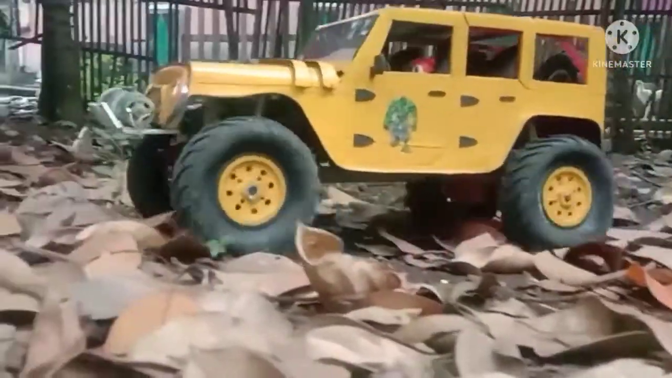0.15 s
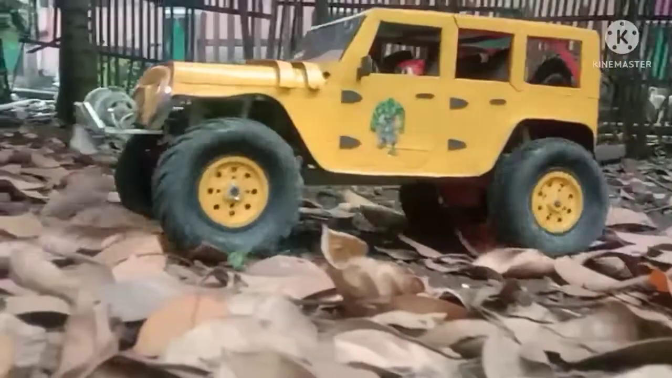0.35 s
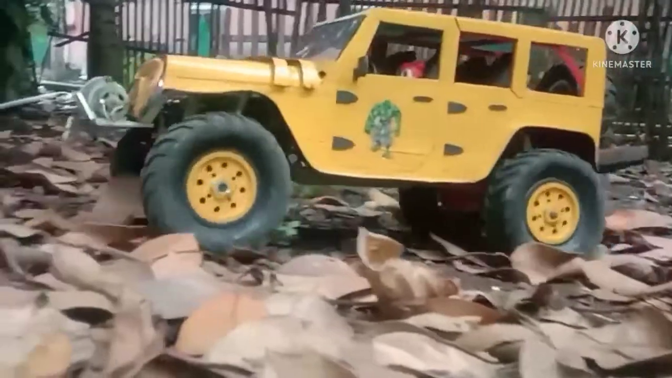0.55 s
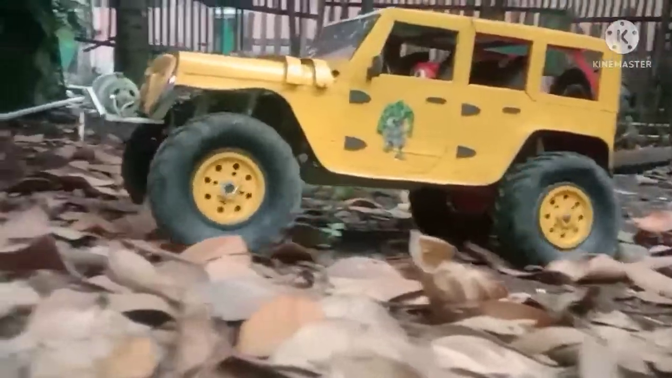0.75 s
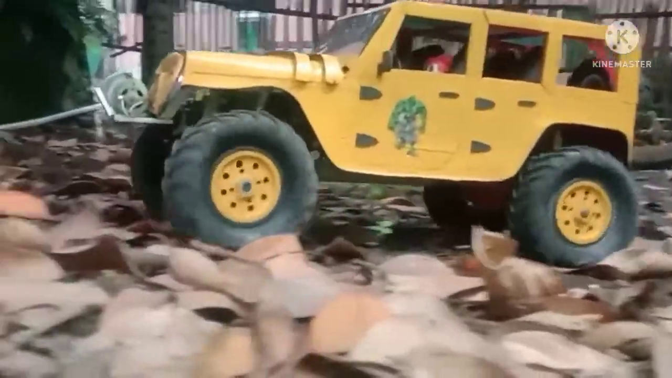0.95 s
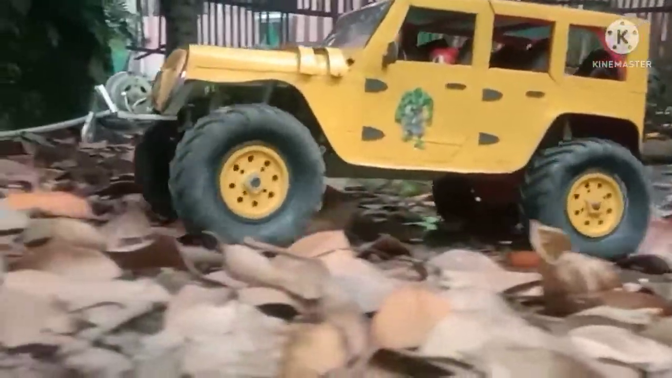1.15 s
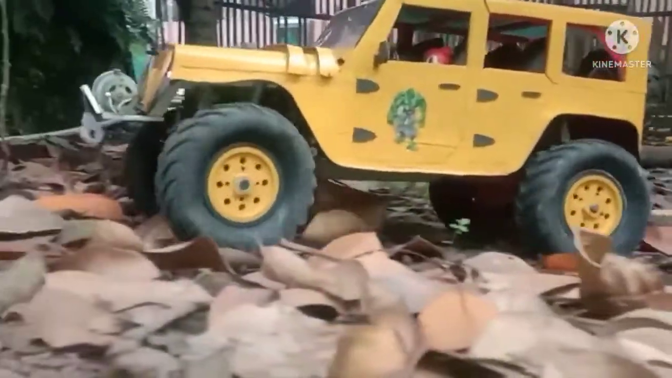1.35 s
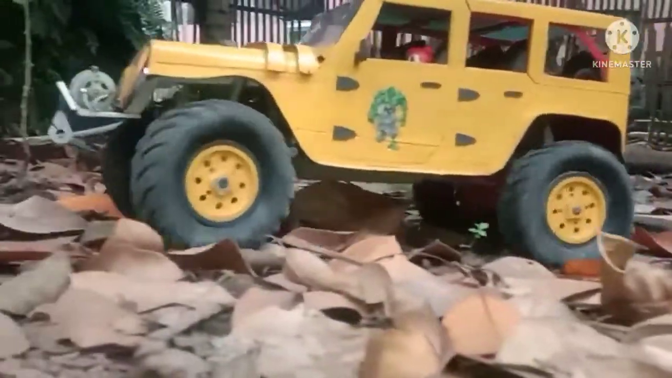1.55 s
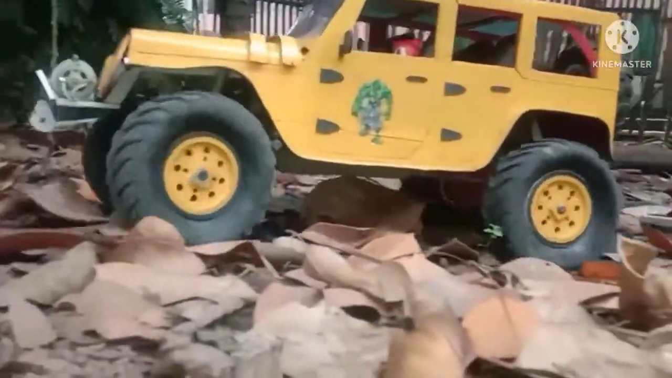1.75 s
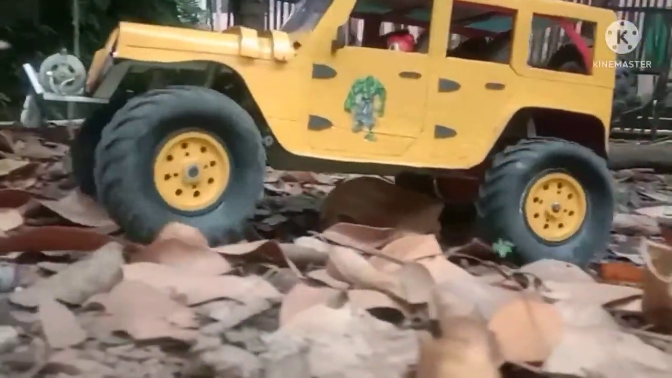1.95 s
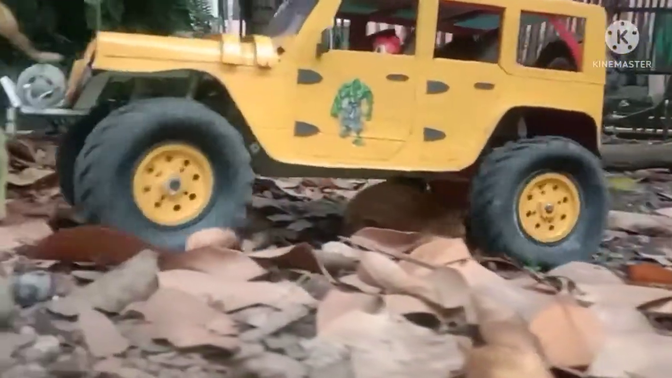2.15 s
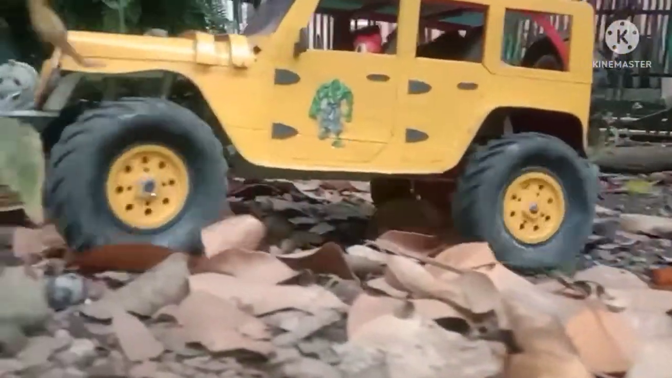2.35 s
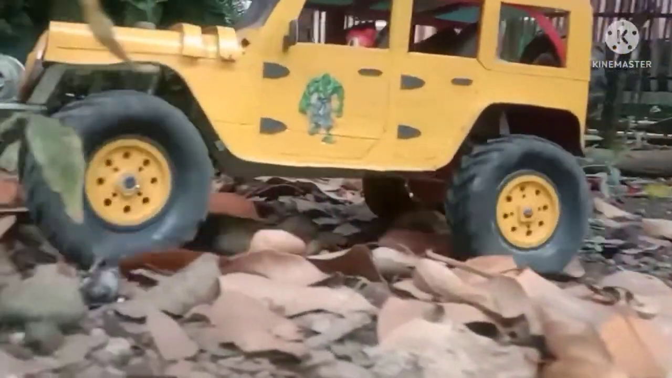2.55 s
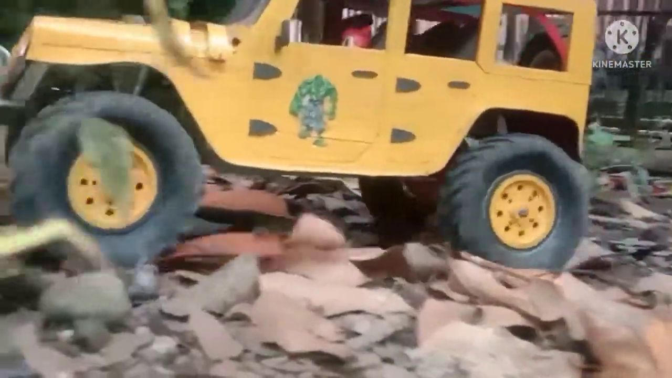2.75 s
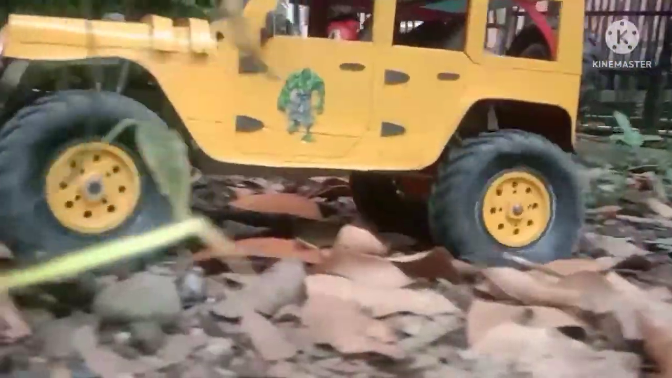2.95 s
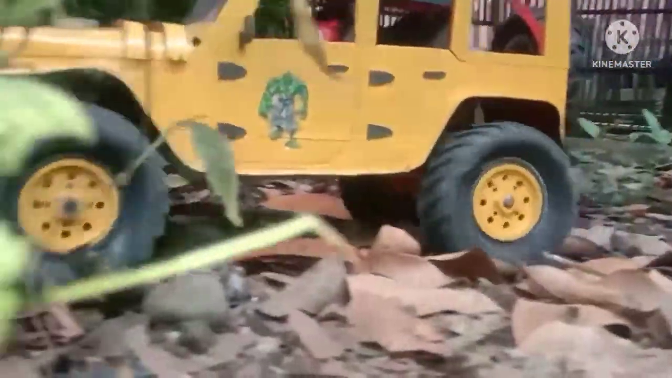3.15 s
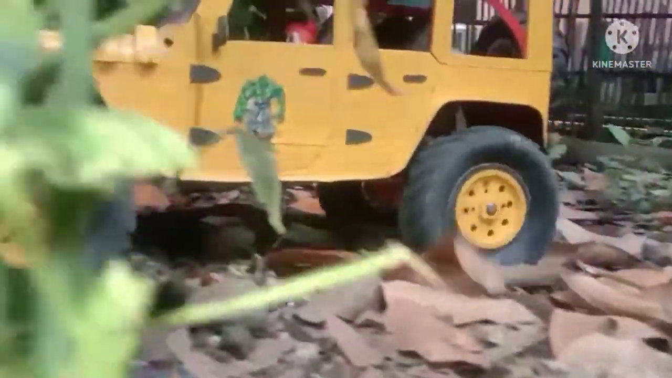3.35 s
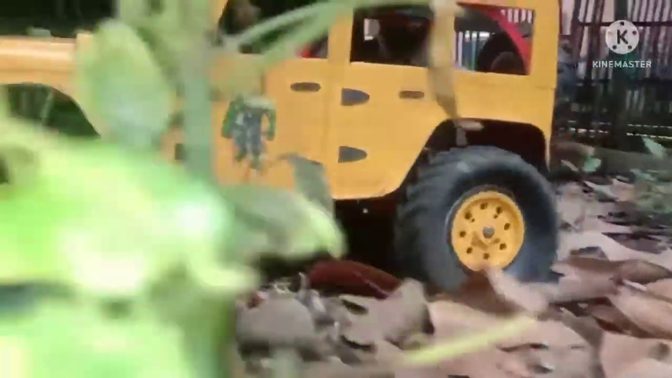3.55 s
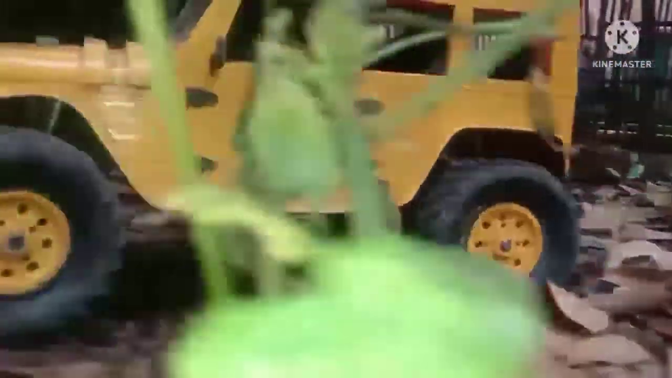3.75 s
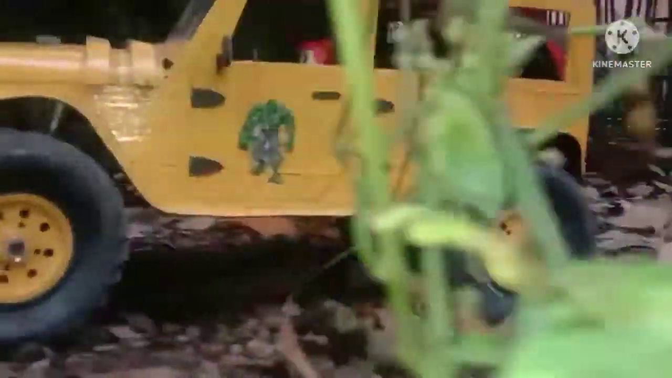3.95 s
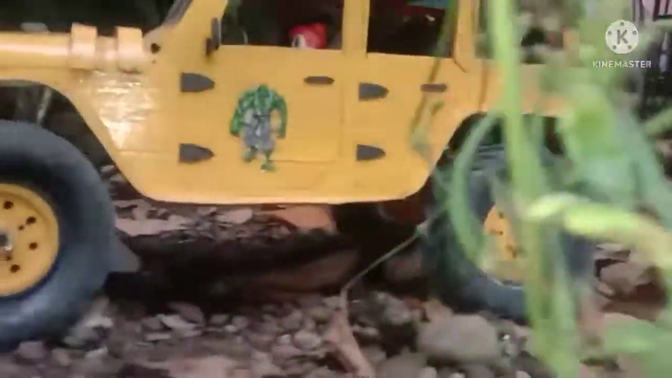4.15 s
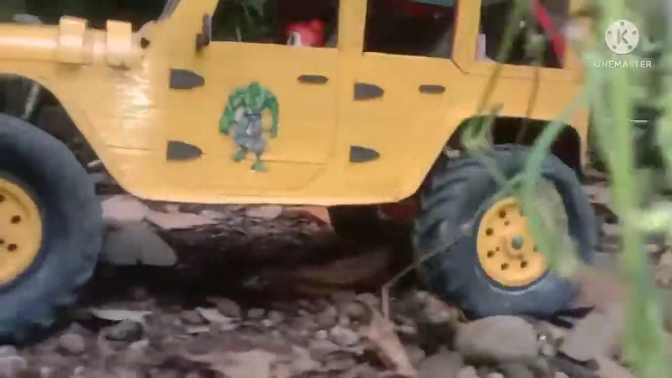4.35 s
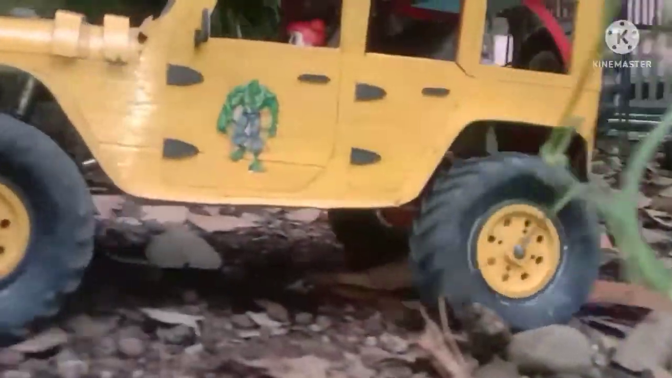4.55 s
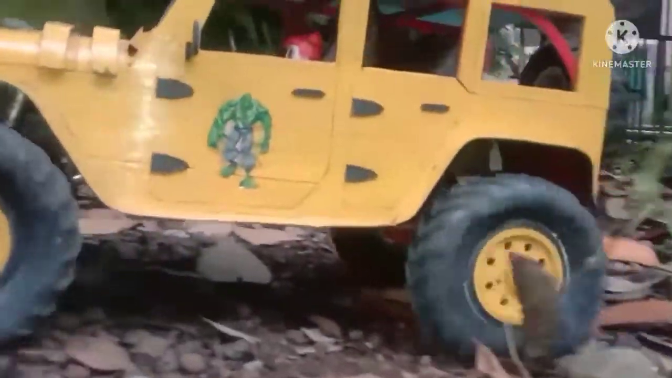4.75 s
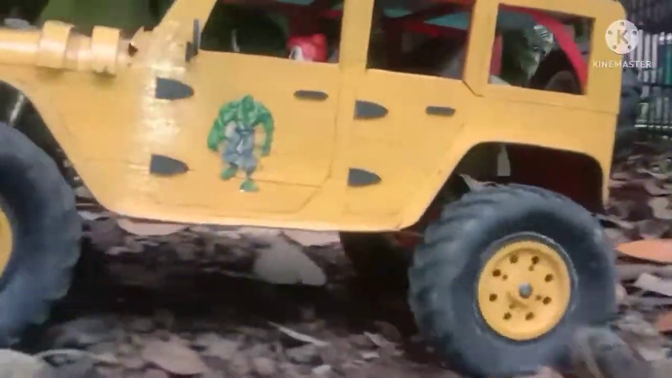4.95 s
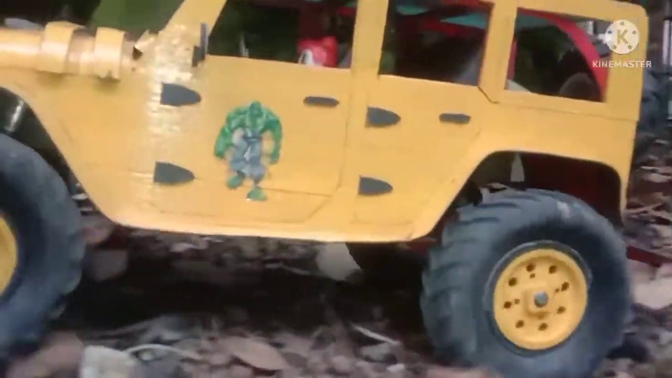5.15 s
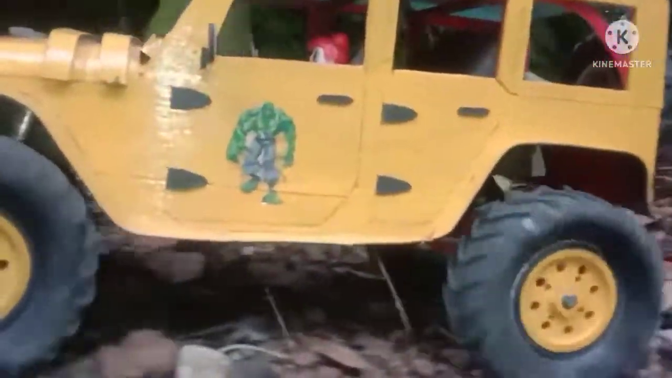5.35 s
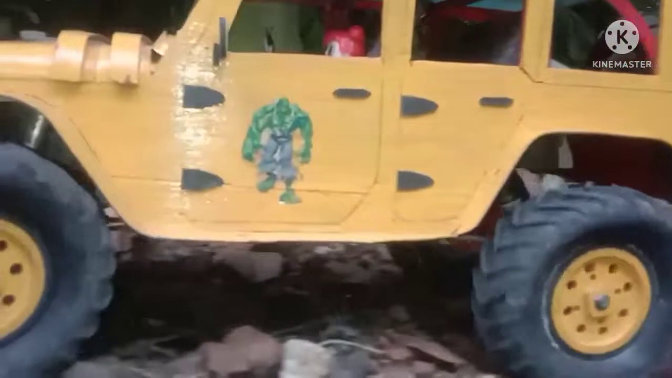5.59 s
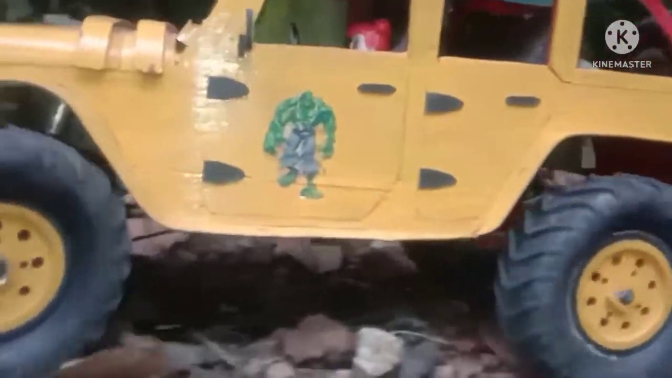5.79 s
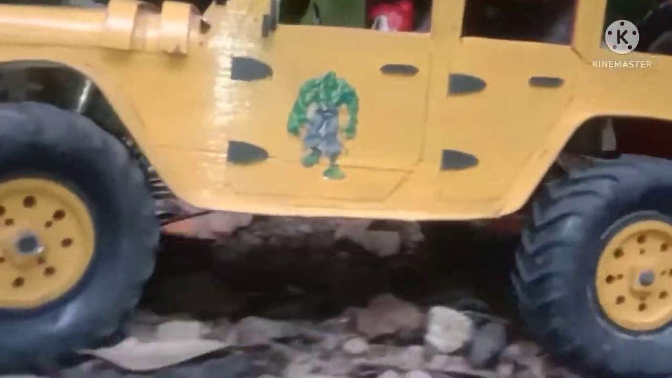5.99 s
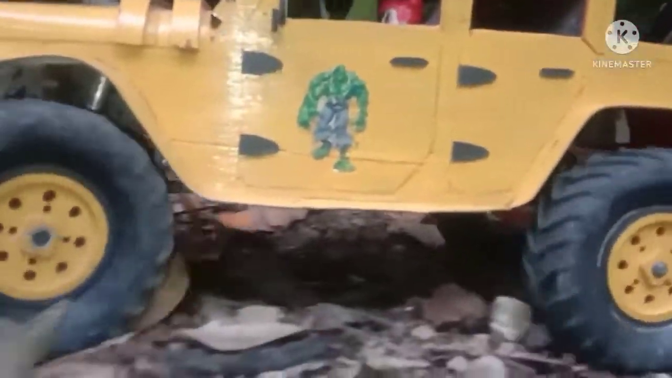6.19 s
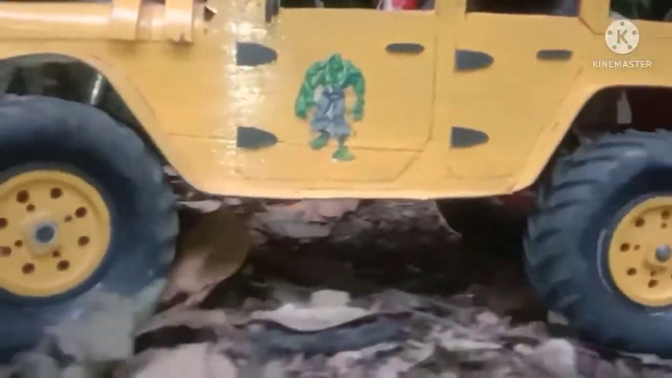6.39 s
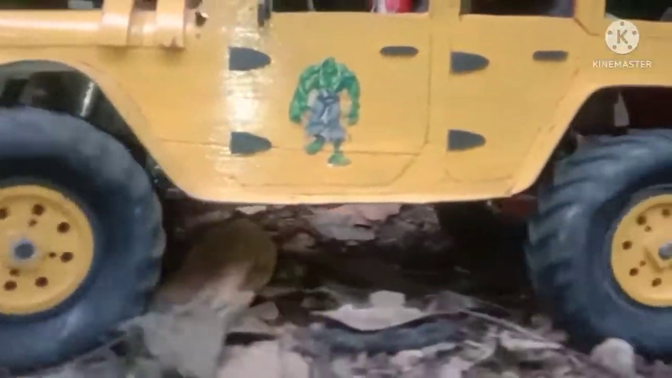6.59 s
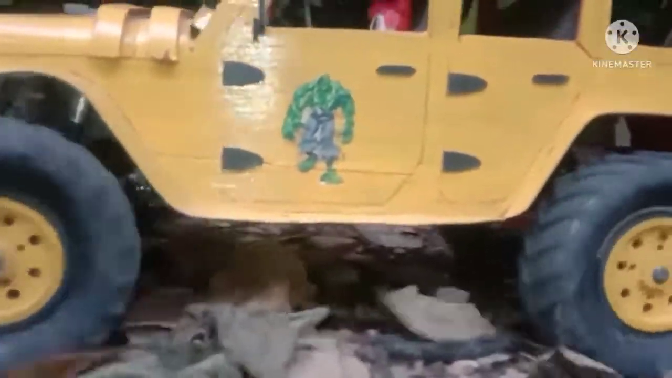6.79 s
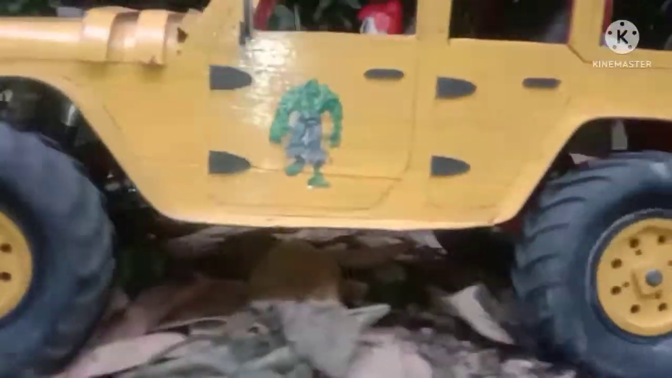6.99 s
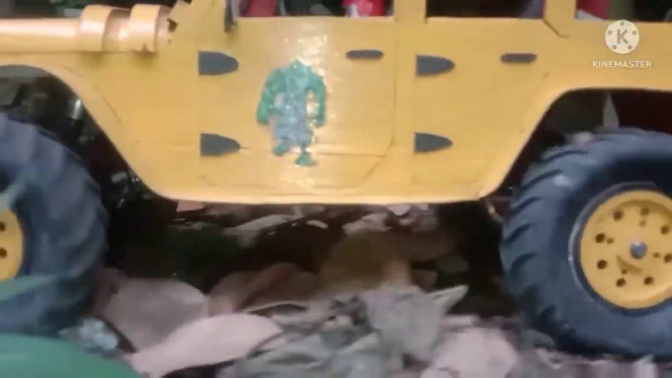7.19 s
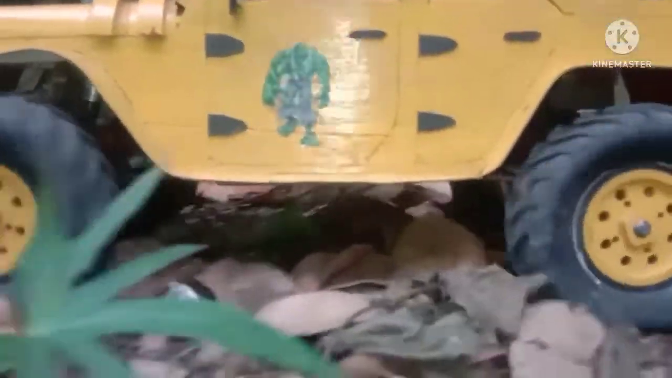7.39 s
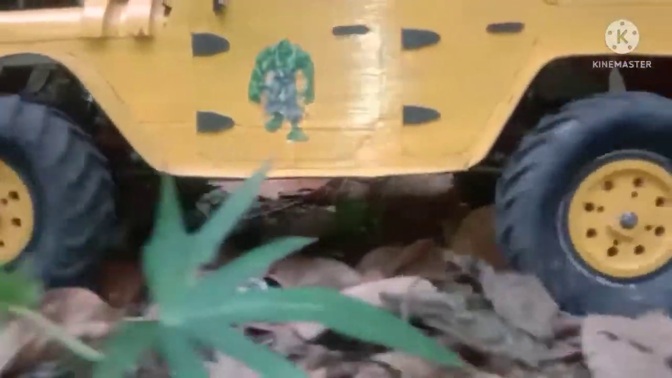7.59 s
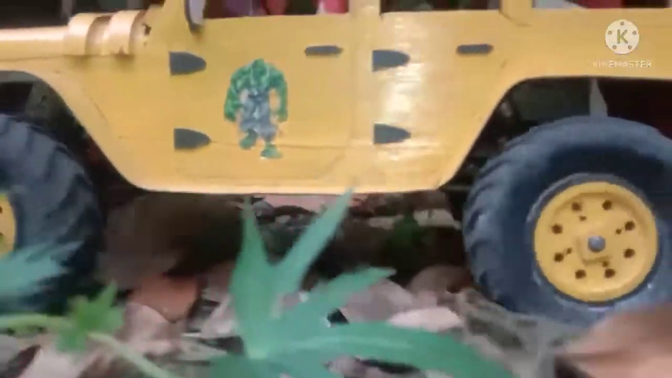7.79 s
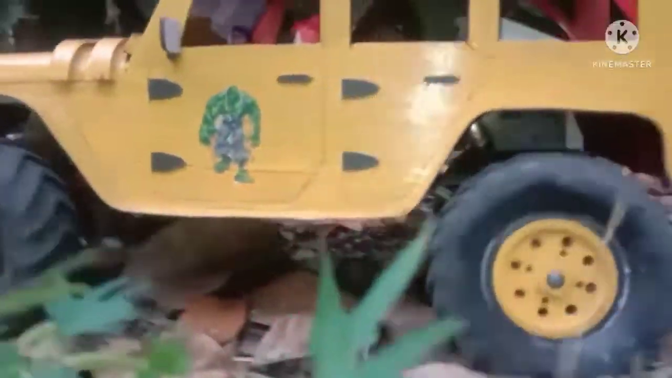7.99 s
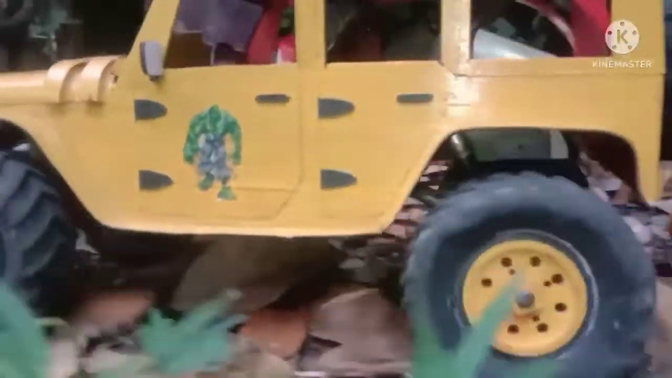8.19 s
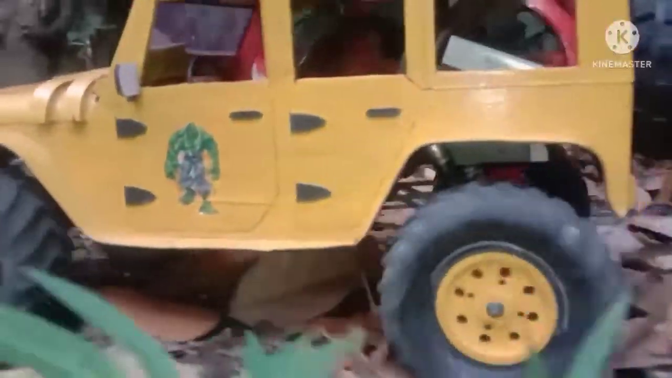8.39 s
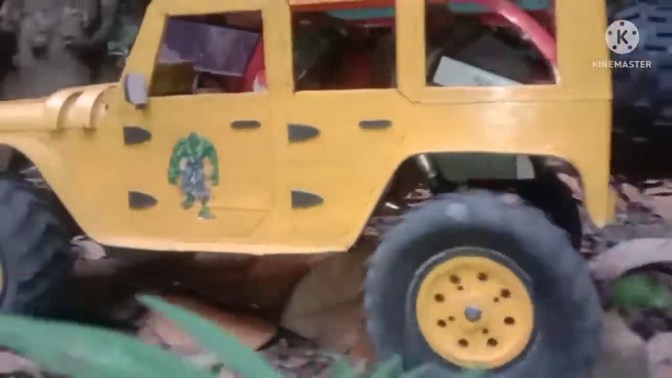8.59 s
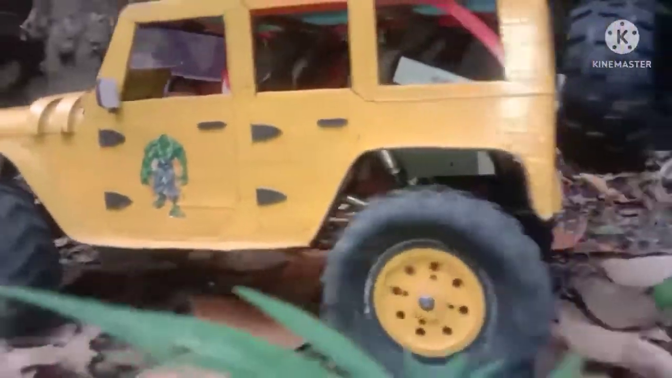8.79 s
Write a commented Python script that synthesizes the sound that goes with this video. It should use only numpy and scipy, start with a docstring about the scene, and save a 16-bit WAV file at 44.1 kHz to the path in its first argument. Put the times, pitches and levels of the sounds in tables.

```python
"""A toy crawler truck whines past a phone on the forest floor, creeping over dry leaves and dirt.
Partials of the gear-mesh rate make the whine, whose pitch sags and recovers with the load; tooth strikes
make a chatter in bursts each shaft turn, louder with speed and softer when the throttle eases.
The same drive shakes chassis, shell and gear case: noise and strikes through body resonances.
Filtered noise bursts make crackling leaves and odd knocks; filtered noise, a tyre scuff and faint air rumble."""
import sys
import numpy as np
from scipy import signal
from scipy.fft import rfft, irfft
from scipy.io import wavfile
from scipy.ndimage import uniform_filter1d, minimum_filter1d, map_coordinates

SR = 44100
rng = np.random.default_rng(int(sys.argv[2]) if len(sys.argv) > 2 else 0)


def generate_wav(signal):
    """Clip the signal to [-1, 1] and save it as 16-bit WAV at the path in sys.argv[1]."""
    frames = np.transpose(np.atleast_2d(signal))
    scaled = np.clip(frames, -1, 1) * 32767
    pcm = np.round(scaled).astype(np.int16)
    wavfile.write(sys.argv[1], SR, pcm)


N = 389403
T = np.arange(N) / SR  # time axis [s]


def undb(db):
    """Decibels to gain."""
    return 10 ** (np.asarray(db) / 20)


def unit(x):
    """Scale to rms 1."""
    return x / np.sqrt(np.mean(x ** 2))


def curves(table):
    """The columns of a table after its time column, joined by straight lines in time."""
    s, *columns = np.transpose(table)
    return [np.interp(T, s, c) for c in columns]


def walk(rate):
    """Smooth random drift of rms 1 that takes a new value rate times a second."""
    hold = max(int(SR / rate), 2)
    steps = np.repeat(rng.standard_normal(N // hold + 1), hold)
    return unit(uniform_filter1d(steps, hold)[:N])


def ring(x, colour, modes=()):
    """Pass x through a causal body with a broad colour and resonances; white noise keeps its power."""
    size = 4096
    f = np.maximum(np.arange(size // 2 + 1) * SR / size, 1)
    hz, db = np.transpose(colour)
    db = np.interp(np.log(f), np.log(hz), db)
    for centre, width, lift in modes:
        db = db + lift / (1 + (2 * (f - centre) / width) ** 2)
    # folding the cepstrum gives minimum phase: the body answers only after it is struck
    cepstrum = irfft(np.log(undb(db)))
    cepstrum[1:size // 2] *= 2
    cepstrum[size // 2 + 1:] = 0
    response = irfft(np.exp(rfft(cepstrum)))
    return signal.oaconvolve(x, response / np.linalg.norm(response))[:N]


def bursts(times, levels_db, decay_s):
    """A short burst of noise at each time, fading exponentially like a crunch of contact."""
    out = np.zeros(N + SR)
    t = np.arange(SR // 10) / SR
    for s, db in zip(times, levels_db):
        start = int(s * SR)
        out[start:start + len(t)] += undb(db) * np.exp(-t / decay_s) * rng.standard_normal(len(t))
    return out[:N]


# outdoor air colour: (frequency [Hz], relative level [dB])
AIR_COLOUR = [(20, -36), (42, -30), (60, -16), (75, -1), (100, 3.5), (125, -3), (170, -1), (260, -14.5),
              (600, -18), (2000, -31.5)]
AIR_DB = -62.5  # middle level of the air, about which it swells


def air():
    """Low-coloured noise: a faint, slowly swelling outdoor rumble."""
    rumble = unit(ring(rng.standard_normal(N), AIR_COLOUR))
    return rumble * undb(AIR_DB + 2.7 * walk(14))


# dry leaves snapping clearly: (time [s], relative level [dB])
LEAF_SNAPS = [(0.3694, -51), (0.534, -43), (4.3248, -39), (6.787, -38)]
# leaf colour: (frequency [Hz], relative level [dB])
LEAF_COLOUR = [(800, -16), (2500, -5), (6000, 7), (9000, -2), (13000, -10), (16000, 1)]


def leaves(snap_db, crackle_db, count=90):
    """Dry leaves give under the tyres: a few clear snaps and many faint ones, as very short noise bursts."""
    s, db = np.transpose(LEAF_SNAPS)
    chance = rng.random((count, 2))
    crackle = bursts(chance[:, 0] * T[-1], crackle_db - 14 * chance[:, 1], decay_s=0.00092)
    snaps = bursts(s, db + snap_db, decay_s=.0018)
    return ring(snaps + crackle, LEAF_COLOUR)


# tyre scuff colour: (frequency [Hz], relative level [dB])
SCUFF_COLOUR = [(400, -23), (800, -5), (1020, 1), (1200, 6), (1600, -33)]


def scuff(at_s, length_s, db):
    """The front tyre slips briefly over a leaf: friction noise that swells and fades."""
    swell = np.exp(-((T - at_s) / length_s) ** 2)
    return unit(ring(rng.standard_normal(N), SCUFF_COLOUR)) * undb(db) * swell


# knocks of the chassis on stones and twigs: (time [s], thud level [dB], clack level [dB])
CHASSIS_KNOCKS = [(0.534, -48, -43), (1.272, -60, -30.5), (2.214, -47, -42), (5.746, -56, -40),
                  (5.766, -49, -32), (5.784, -45, -26), (5.789, -43, -24), (5.801, -45, -36),
                  (5.975, -48, -45)]
# chassis colour, also of its rumble: (frequency [Hz], relative level [dB])
CHASSIS_COLOUR = [(35, -45), (100, -19), (260, -5), (350, 0), (450, -1.5), (560, -2.5), (750, -0.5),
                  (1000, -2.5), (1800, -35.5)]
# clack colour: (frequency [Hz], relative level [dB])
CLACK_COLOUR = [(600, -18), (1300, -2), (1900, -1), (2500, -6), (3400, -2), (4000, 6), (4700, 6),
                (5400, -8), (9000, -22), (13000, -36)]


def knocks():
    """The chassis meets something hard: a duller, longer thud and a brighter, shorter clack."""
    s, thud_db, clack_db = np.transpose(CHASSIS_KNOCKS)
    thud = ring(bursts(s, thud_db, decay_s=.009), CHASSIS_COLOUR)
    clack = ring(bursts(s, clack_db, decay_s=.0022), CLACK_COLOUR)
    return thud + clack


# speed of the drive, sagging and recovering with the load: (time [s], tooth mesh rate [Hz])
DRIVE_SPEED = [(0.0, 1377), (0.32, 1329), (0.58, 1518), (0.73, 1355), (0.92, 1332), (1.1, 1515),
               (1.25, 1363), (1.4, 1462), (1.56, 1362), (1.66, 1525), (1.77, 1530), (1.89, 1345),
               (2.05, 1272), (2.21, 1598), (2.3, 1524), (2.41, 1532), (2.52, 1577), (2.62, 1435),
               (2.78, 1520), (2.92, 1667), (3.11, 1600), (3.36, 1872), (3.7, 1484), (3.89, 1408),
               (4.14, 1657), (4.32, 1552), (4.38, 1613), (4.47, 1546), (4.6, 1544), (4.73, 1738),
               (4.79, 1735), (4.88, 1547), (5.12, 1715), (5.37, 1550), (5.46, 1668), (5.77, 1519),
               (5.85, 1377), (6.03, 1411), (6.18, 1347), (6.37, 1586), (6.55, 1615), (6.75, 1650),
               (6.81, 1703), (6.88, 1639), (7.02, 1824), (7.14, 1634), (7.28, 1754), (7.41, 1702),
               (7.56, 1634), (7.68, 1764), (7.87, 1684), (7.95, 1777), (8.18, 1776), (8.3, 1551),
               (8.38, 1559), (8.53, 1877), (8.68, 1738), (8.76, 1841)]
CRUISE_HZ = 1600  # mesh rate at cruising speed


def speed():
    """Speed of the drive in octaves above cruising."""
    return np.log2(curves(DRIVE_SPEED)[0] / CRUISE_HZ)


# the throttle eases and the teeth run unloaded: (start [s], end [s], level change [dB])
THROTTLE_EASINGS = [(0.685, 0.944, 0), (1.16, 1.256, -3), (2.543, 2.729, -4), (3.659, 4.019, -2.5),
                    (5.79, 6.278, -2), (8.202, 8.581, -0.5)]
EASE_S = 0.0083  # time for the load to leave or return


def easing():
    """Level change in dB, at most 0, while the throttle is eased; each part takes its own share."""
    total = 0
    for start, end, db in THROTTLE_EASINGS:
        total = total + db * (np.tanh((T - start) / EASE_S) - np.tanh((T - end) / EASE_S)) / 2
    return total


# how strongly the gearbox is heard as the truck nears and turns: (time [s], level at cruising speed [dB])
# each part of the truck takes a share of it
GEAR_PRESENCE = [(0, -11), (.52, -8.5), (1.9, -8), (2.2, -3.5), (2.75, -3.5), (3.15, -3), (3.33, -5.6),
                 (3.5, -2.5), (4.15, 1), (4.7, 0.1), (5.25, -0.3), (5.48, 1.1), (5.7, -0.1), (7.02, 0.5),
                 (7.45, 2), (8.1, 0.5), (8.83, -2)]
# the body's rattle grows steadily as the truck creeps closer; when it is abreast
APPROACH_DB_PER_S, ABREAST_S = 0.71, 4.67


def loudness(cruise_db, db_per_octave, presence, approach, load):
    """Level in dB of a part of the truck: speed sets it, with shares of presence, approach and load."""
    nearing_db = APPROACH_DB_PER_S * (T - ABREAST_S)
    return (cruise_db + db_per_octave * speed() + presence * curves(GEAR_PRESENCE)[0]
            + approach * nearing_db + load * easing())


# moments at which the truck shows its nose, flank, rear wheel and tail: (time [s])
ASPECT_TIMES = [1.3, 4.4, 6.8, 7.7]
# resonances of the truck: (centre [Hz], width [Hz],
# lift towards the nose [dB], the flank [dB], the rear wheel [dB], the tail [dB])
TRUCK_RESONANCES = [(374.6, 123.3, -1.5, -2.5, 6, 1), (552.4, 163, 3.5, 10, 9.5, 2),
                    (685, 91, -5.5, -4.5, 0, 7.5), (1264, 77, 8, 10, 11, 12.5),
                    (2185, 240, 1.5, 2.5, 4, 9.5), (2343, 39, -9, 9.5, 6.5, 10),
                    (4420, 480, 3.5, 3.5, 1.5, 6), (4860, 100, 2.5, 0.5, 9, 0), (5230, 165, 3.5, 7, 9.5, 2),
                    (5500, 200, 9, -0.5, 1.5, 5), (5980, 100, 3, 15, -2, -12), (6380, 230, 8, 9, 4, -3.5),
                    (6570, 210, -1.5, -5, 0, 7), (7100, 230, 8, 4.5, 4.5, 8.5), (7700, 200, 6, -1, 1, 1),
                    (9180, 510, 4.5, 4, -5, 4)]


def passing(x, colour):
    """The truck's resonances colour x, each by its own amount as the truck turns past."""
    out = 0
    for k, share in enumerate(np.eye(len(ASPECT_TIMES))):
        modes = [(hz, width, lifts[k]) for hz, width, *lifts in TRUCK_RESONANCES]
        crossfade = np.interp(T, ASPECT_TIMES, share)
        out = out + crossfade * unit(ring(x, colour, modes))
    return out


def bounces(x, near_ms, far_ms, gain, drift, count=4):
    """Short echoes off the ground and the wheels; their paths shift as the truck moves and comb the sound."""
    out, n = x, np.arange(N)
    for ms in np.geomspace(near_ms, far_ms, count):
        lag = ms * (1 + drift * walk(2.5)) * SR / 1000  # in samples
        out = out + gain * map_coordinates(x, [n - lag], order=3)
    return unit(out)


TEETH = 30  # teeth that mesh in one shaft turn


def impacts(teeth, scatter_db, swing_db, slack, rub):
    """Teeth strike loosely, harder at a few places of each shaft turn, and rub between strikes."""
    turn = 2 * np.pi * teeth / TEETH
    pattern = (np.cos(turn + 1.1 * walk(6.2)) + np.cos(2 * turn + .5 * walk(7.1))
               + 0.82 * np.cos(3 * turn) + .5 * np.cos(6 * turn))
    press = undb(swing_db * np.tanh(pattern))
    tooth = np.arange(int(teeth[-1]))
    chance = rng.standard_normal((len(tooth), 2))
    # slack, in tooth spacings, makes each strike early or late
    at = np.interp(tooth + slack * chance[:, 0], teeth, np.arange(N)).astype(int)
    force = undb(scatter_db * np.clip(chance[:, 1], -2, 2))
    strikes = np.bincount(at, force, N)
    return unit(press * (unit(strikes - strikes.mean()) + rub * rng.standard_normal(N)))


# body shell colour: (frequency [Hz], relative level [dB])
SHELL_COLOUR = [(500, -14), (900, -9.5), (1200, 4), (1600, -2), (2200, 1), (2800, -1), (4000, -29)]
# gear case colour: (frequency [Hz], relative level [dB])
CASE_COLOUR = [(1500, -24.5), (2700, -4.5), (3400, 4.5), (4300, 1), (5200, -2.5), (7000, -23.5)]


def body(teeth):
    """Backlash in the drive rattles the chassis, the plastic shell and the gear case."""
    chassis_db = loudness(cruise_db=-56.5, db_per_octave=0.0, presence=.55, approach=.1, load=0)
    shell_db = loudness(cruise_db=-48.0, db_per_octave=8, presence=0.19, approach=0.7, load=0)
    case_db = loudness(cruise_db=-43.5, db_per_octave=12, presence=0, approach=0.86, load=0.23)
    rumble = passing(rng.standard_normal(N) * undb(3.06 * walk(40)), CHASSIS_COLOUR)
    rumble = bounces(rumble, near_ms=5.63, far_ms=13.04, gain=0.35, drift=0.1566)
    rattle = passing(impacts(teeth, scatter_db=4, swing_db=2.5, slack=.8, rub=0.54), SHELL_COLOUR)
    rasp = passing(impacts(teeth, scatter_db=4, swing_db=2.5, slack=.5, rub=0.6), CASE_COLOUR)
    rasp = bounces(rasp, near_ms=1.922, far_ms=6.5, gain=0.44, drift=0.0463)
    return undb(chassis_db) * rumble + undb(shell_db) * rattle + undb(case_db) * rasp


# bouts in which a loose gear clatters: (middle [s], half length [s], strength relative to the chatter [dB])
CLATTER_BOUTS = [(.1, 0.66, -16), (3.252, 0.61, -11), (4.4, .3, 1), (5.521, .17, -4), (7.9, 0.37, -4)]
IDLE_CLATTER_DB = -10.5  # between the bouts


def looseness():
    """Strength of the loose gear's clatter: low, with a smooth swell for each bout."""
    strength = undb(IDLE_CLATTER_DB)
    for s, length, db in CLATTER_BOUTS:
        strength = strength + undb(db) * np.exp(-((T - s) / length) ** 2)
    return strength


# gearbox colour: (frequency [Hz], relative level [dB])
GEARBOX_COLOUR = [(2500, -32.5), (4000, -13.5), (5000, -8.5), (6300, -2), (7200, -5.5), (8000, -14.5),
                  (9300, -20), (10000, -24.5), (12400, -37), (13900, -38), (14650, -14.5), (15500, -18.5)]
# ring of the loose gear's clatter: (frequency [Hz], relative level [dB])
CLATTER_COLOUR = [(4500, -36.5), (5500, -13), (5900, 6.5), (6250, 3.5), (6600, -6.5), (7300, -8),
                  (9000, -46)]


def gearbox(teeth, rasp_db, clatter_db, flutter_db, overtone_db):
    """Bright tooth chatter; a loose gear also rings the case in bursts with every shaft turn."""
    rasp = passing(impacts(teeth, scatter_db=1.0, swing_db=3.5, slack=.3, rub=1.0), GEARBOX_COLOUR)
    rasp = bounces(rasp, near_ms=1.9, far_ms=6.5, gain=0.14, drift=0.046)
    clatter = impacts(teeth, scatter_db=-1, swing_db=6.5, slack=.3, rub=0.68)
    clatter = unit(ring(clatter, CLATTER_COLOUR))
    loose = looseness()
    # the clatter takes over from the chatter without a jump in power
    mix = (undb(rasp_db) * rasp + undb(clatter_db) * loose * clatter) / np.sqrt(1 + loose ** 2)
    # ragged overtones of the mesh sing inside the chatter
    for k, db in enumerate(overtone_db, 2):
        overtone = unit(np.sin(2 * np.pi * k * teeth + 1.56 * walk(400)))
        mix = mix + undb(db + 2 * walk(12)) * overtone
    level_db = loudness(cruise_db=-32.5, db_per_octave=16.5, presence=0.97, approach=0, load=1)
    return mix * undb(level_db + flutter_db * walk(45))


# the body's response to each partial, which swells as it glides through a resonance:
# (partial frequency [Hz], level [dB])
MESH_BODY = [(1290, -46.5), (1350, -52), (1410, -55.5), (1550, -48), (1660, -56), (1760, -52.5),
             (1870, -56)]
OCTAVE_BODY = [(2700, -3.5), (2950, -2), (3100, 0), (3320, -0.2), (3480, -5.5), (3740, -16)]
TWELFTH_BODY = [(3900, -28), (4500, -3.5), (4800, 1.5), (5600, 1)]
# the whine's octave and twelfth, before the body's response and load: (time [s], level [dB])
OCTAVE_SWELL = [(0, -45), (.7, -57.5), (1.05, -46.5), (2.2, -48), (2.8, -44), (3.15, -41.5), (3.35, -47),
                (4.15, -38), (4.55, -44.5), (4.75, -37), (5.32, -40.5), (5.5, -51), (5.7, -38), (6.2, -53),
                (6.75, -35.5), (7, -34.5), (7.15, -31.5), (7.22, -48), (8.15, -46), (8.28, -34.5),
                (8.7, -55)]
TWELFTH_SWELL = [(0, -62), (1.1, -48), (1.7, -46), (2.3, -56), (3, -57), (3.55, -49), (4.8, -39),
                 (5.6, -43.5), (6, -58), (7.1, -44), (8.83, -49)]
ROUGH, ROUGH_PER_OCTAVE = 0.34, 0.19  # fraying at cruising speed (0-1), and its rise with speed
MESHES_PER_TURN = 224  # tooth meshes in one turn of the slow drive shaft
SHAFT_THROB_DB = 1.5  # the mesh tone swells once in each of those turns


def whine(teeth, tone_db, roughness, wobble, flutter_db, throb):
    """Mesh tone and overtones; an off-centre gear wobbles them once a turn and uneven teeth fray them."""
    turn = 2 * np.pi * teeth / TEETH
    phase = 2 * np.pi * teeth + wobble * np.sin(turn)
    rough = np.clip(ROUGH + ROUGH_PER_OCTAVE * speed(), 0, 1)
    mesh_hz, eased = curves(DRIVE_SPEED)[0], easing()
    shaft = SHAFT_THROB_DB * np.cos(2 * np.pi * teeth / MESHES_PER_TURN)
    responses = [MESH_BODY, OCTAVE_BODY, TWELFTH_BODY]
    # when the load is off the overtones fade and the mesh tone stands out
    levels = [0.28 * curves(GEAR_PRESENCE)[0] + shaft - 0.37 * eased,
              curves(OCTAVE_SWELL)[0] + 0.57 * eased,
              curves(TWELFTH_SWELL)[0] + 1.985 * eased]
    out = 0
    partials = zip(responses, levels, tone_db, roughness)
    for k, (response, level, trim, share) in enumerate(partials, 1):
        db = level + np.interp(k * mesh_hz, *np.transpose(response))
        fray = share * rough
        ragged = walk(420) * np.sin(k * phase) + walk(420) * np.cos(k * phase)
        tone = np.sin(k * phase) + fray * ragged
        tone = unit(tone * (1 + throb * k * np.cos(turn)) / np.sqrt(1 + 2 * fray ** 2))
        out = out + undb(db + trim + flutter_db * walk(50)) * tone
    # the teeth seat better and worse as the tyres climb
    return out * undb(1.1 * walk(16))


def scene():
    """One gear speed drives the whine, the chatter and the rattle, over the ground sounds and the air."""
    mesh_hz = curves(DRIVE_SPEED)[0] * (1 + .0025 * walk(35))
    teeth = np.cumsum(mesh_hz) / SR  # teeth meshed so far
    ground = (knocks() + leaves(snap_db=8.5, crackle_db=-41.5)
              + scuff(at_s=2.024, length_s=0.071, db=-51.0))
    # whine lists: mesh tone, octave, twelfth
    truck = (whine(teeth, tone_db=[-.5, -1, -2.5], roughness=[.6, 1.0, 1.4],
                   wobble=0.3, flutter_db=1.5, throb=0.051)
             + gearbox(teeth, rasp_db=-1.5, clatter_db=0.5, flutter_db=1.46, overtone_db=[-21, -16, -12])
             + body(teeth))
    return (truck + ground + air())[None]


TOP_HZ = 15500  # the sound is cut above this


def record(dry):
    """The phone's limiter holds down the sharpest peaks, and a steep low-pass cuts the top."""
    ceiling = .135
    gain = ceiling / np.maximum(np.abs(dry), ceiling)
    # 89 samples = 2 ms: hold each dip, then smooth it
    gain = uniform_filter1d(minimum_filter1d(gain, size=89), size=89)
    low_pass = signal.ellip(10, .2, 70, TOP_HZ, fs=SR, output="sos")
    return signal.sosfilt(low_pass, dry * gain)


dry = scene()
out = record(dry)
generate_wav(out)
```